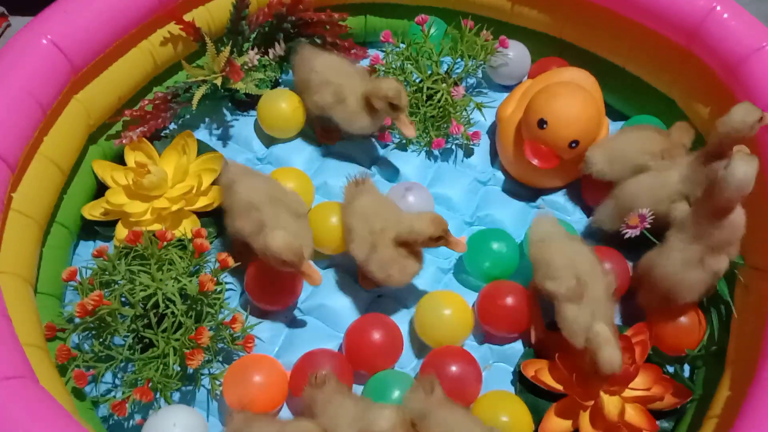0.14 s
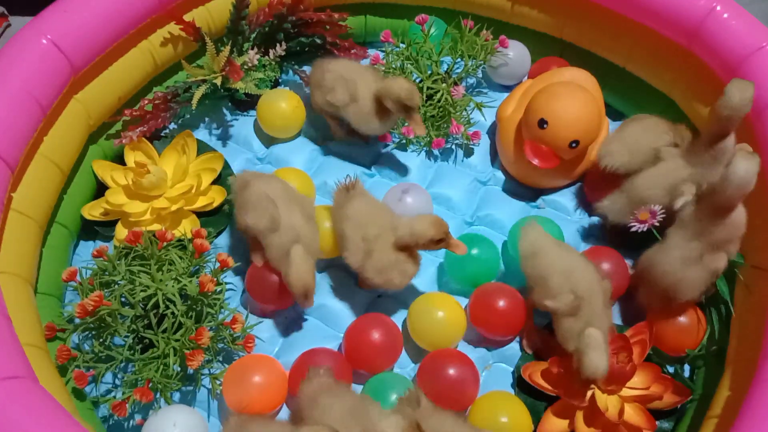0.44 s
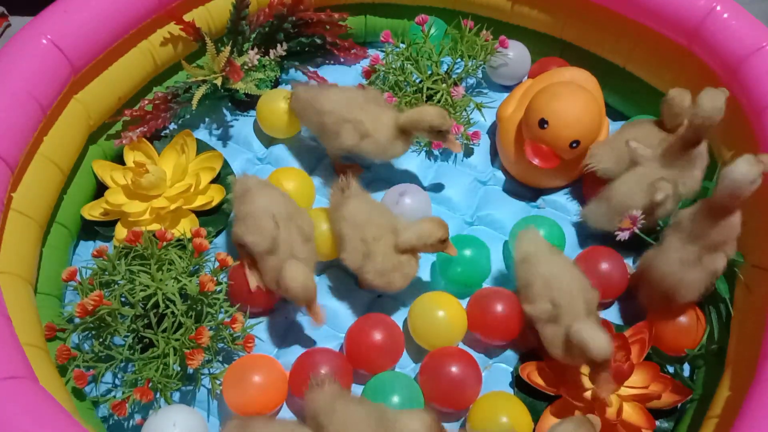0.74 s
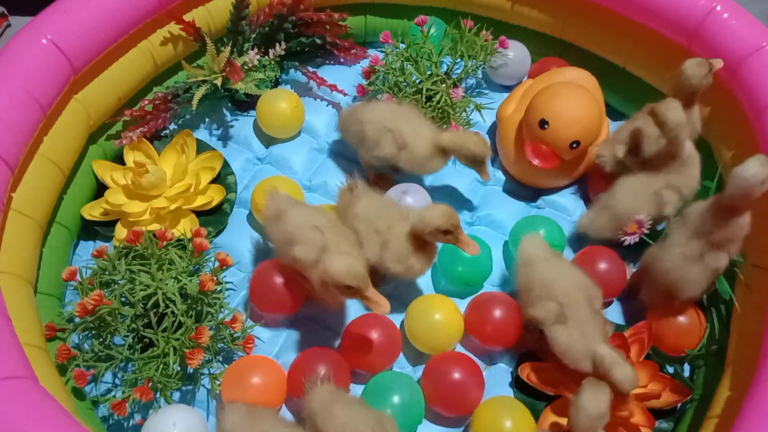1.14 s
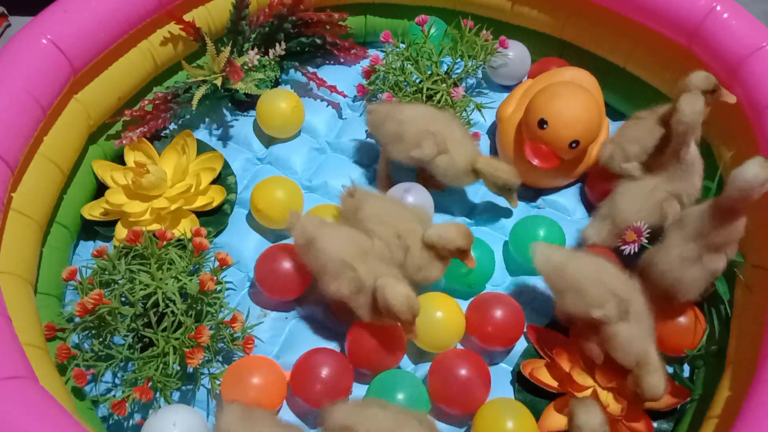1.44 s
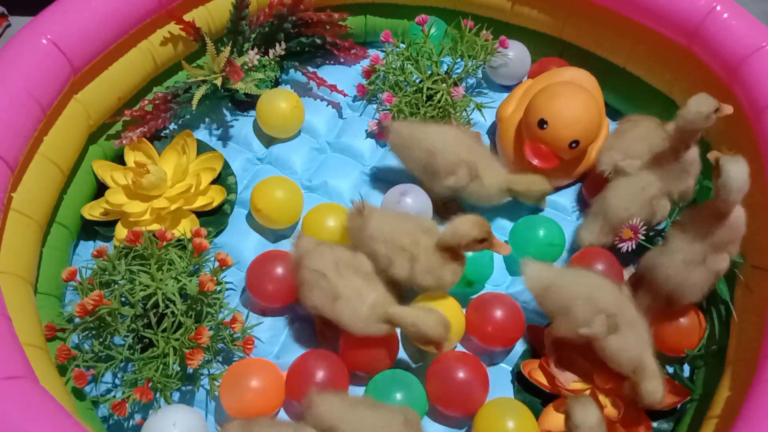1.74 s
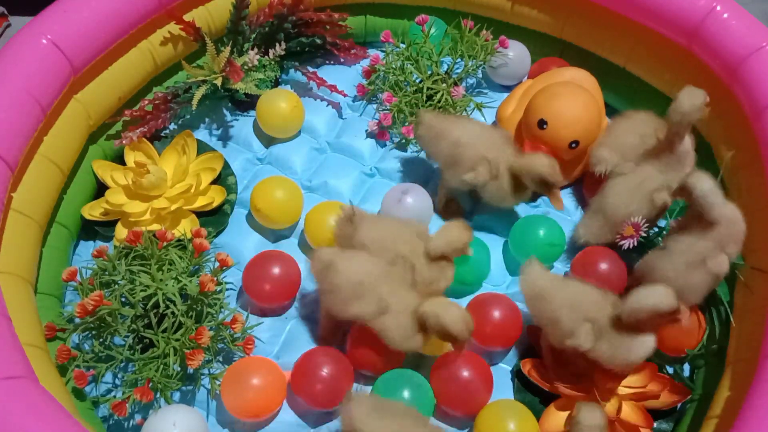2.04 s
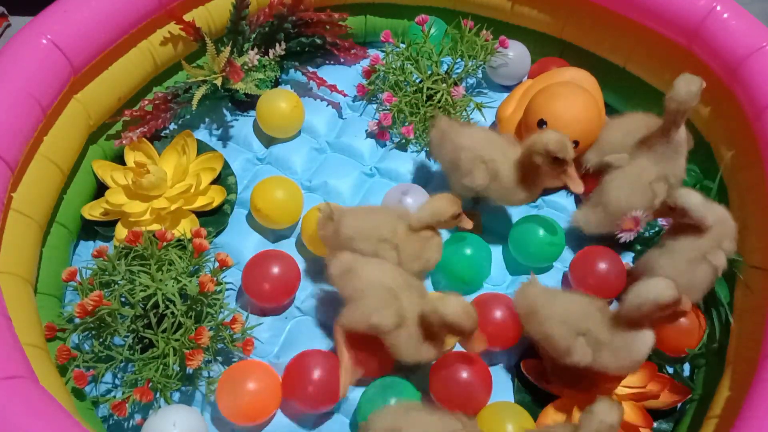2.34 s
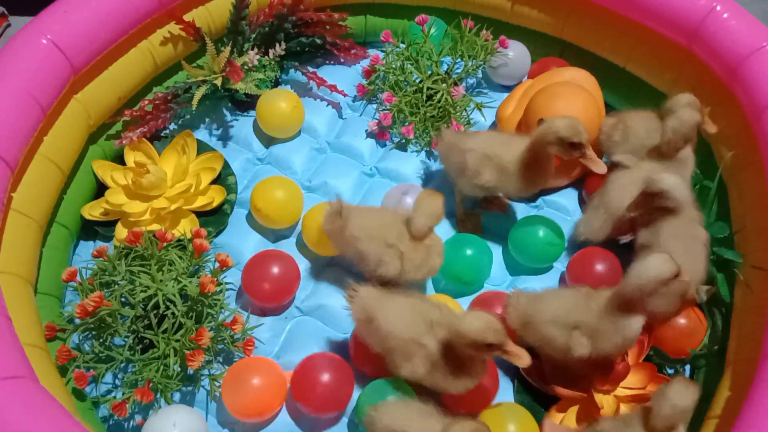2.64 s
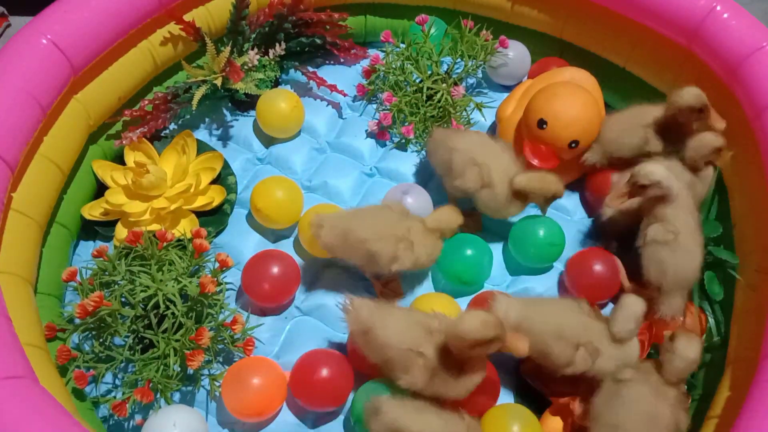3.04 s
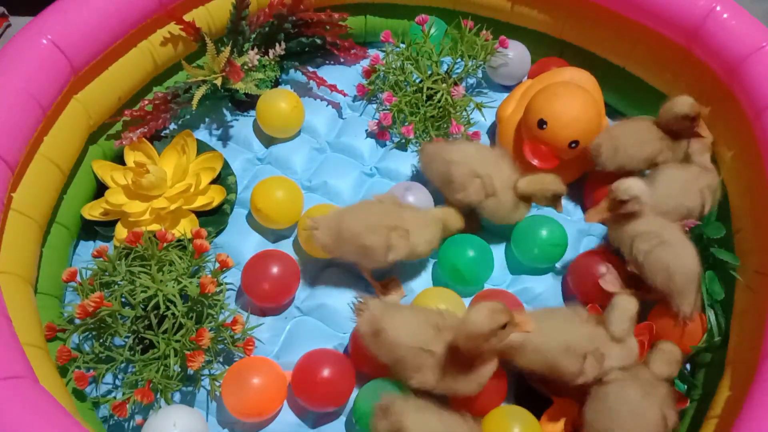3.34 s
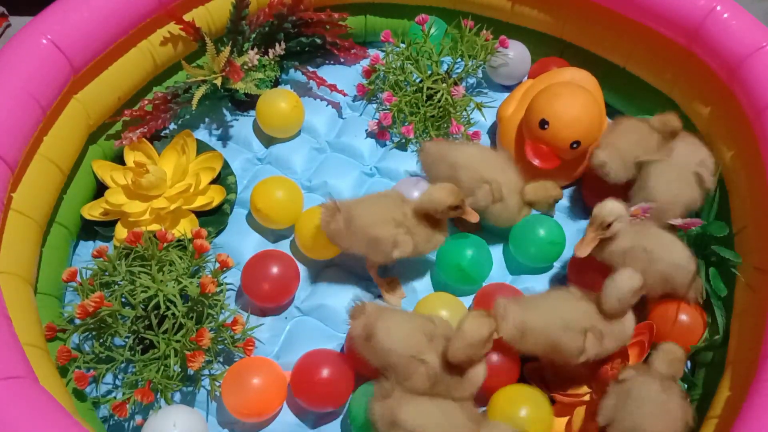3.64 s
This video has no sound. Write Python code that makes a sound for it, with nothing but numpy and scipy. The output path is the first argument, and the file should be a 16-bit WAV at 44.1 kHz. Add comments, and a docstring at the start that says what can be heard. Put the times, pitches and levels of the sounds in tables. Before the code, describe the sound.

Ducklings peep throughout, their short, high whistles rising and falling and often overlapping. From about 0.3 seconds their paddling feet slosh shallow water in uneven strokes, with light spray and bubbling. Hollow plops start just after 1 second, loudest near 1.7 and 3.2 seconds. The peeping and sloshing carry on until nearly 4 seconds, with a short echo from nearby walls, over a faint low hum and thin hiss.

```python
"""From the start, ducklings in a shallow inflatable pool of plastic balls peep over one another,
each peep a short whistle arching up and down in pitch, above a mains hum and a thin hiss.
Soon their paddling feet slosh the water, throwing spray and setting small bubbles ringing.
After about a second come hollow plops, loudest near 1.7 s and 3.2 s. Peeping and sloshing go on
to the end, and nearby walls follow each sound with a short echo."""
import sys
import numpy as np
from scipy import signal
from scipy.fft import rfft, irfft
from scipy.io import wavfile

SR = 44100
rng = np.random.default_rng(int(sys.argv[2]) if len(sys.argv) > 2 else 0)


def wav_out(sig):
    """Save sig, one row per channel (or a flat mono array), as 16-bit PCM at SR to the path in sys.argv[1]."""
    wavfile.write(sys.argv[1], SR, np.round(np.clip(np.atleast_2d(sig).T, -1, 1) * 32767).astype(np.int16))


N = 167580

# Mains hum. Each row: harmonic number, rms level in dB.
HUM_HARMONICS = [(1,-47),(3,-55.5)]
# Spectrum of the hiss. Each row: frequency in Hz, relative density in dB.
HISS_SPECTRUM = [(45,-11.5),(250,-1.5),(1900,-11),(4500,-53),(6100,-23.5),(6800,5),(7500,7.5),(8400,-13),(12500,-22.5),(15300,-29.5)]
# Reverberation. Each row: frequency in Hz, seconds to fall by 60 dB.
ROOM_DECAY = [(900,0.19),(9000,0.17)]
# Spectrum of spray and wet ticks. Each row: frequency in Hz, relative density in dB.
SPRAY_SPECTRUM = [(1700,-3.5),(3300,2),(4300,-7),(5500,3),(6200,-2.5),(7300,2.5),(8600,-11),(12000,-13),(15300,-1.5)]
# Strokes of the feet. Each row: peak time in seconds, time constant in seconds, spray level in dB,
# bubbling level in dB.
FOOT_STROKES = [(0.314,0.046,-28.5,-48),(0.46,0.24,-35.5,-74),(0.684,0.024,-28,-32),(1.047,0.061,-36.5,-39),(1.248,0.07,-30.5,-40.5),(1.41,0.054,-34,-61),(1.79,0.015,-46,-25),
                (2.06,0.025,-27.5,-28.5),(2.196,0.037,-33,-31),(2.322,0.013,-29,-25),(2.453,0.075,-26,-44),(2.641,0.042,-28,-36.5),(3.047,0.045,-33.5,-42.5),(3.203,0.092,-31,-33.5),(3.56,0.049,-26,-32)]
# Hollow plops. Each row: start in seconds, level in dB, pitch in Hz, swell time in seconds,
# relative level of the tick in dB.
HOLLOW_PLOPS = [(1.1575,-10,2800,0.0003,-8.5),(1.1672,-18.5,1050,0.0003,-6),(1.69,0,1133,0.00081,-16.5),(2.038,-17,1330,.0012,-4.5),(2.315,-12.5,1065,0.00069,-5),
                (3.197,-3,1240,0.00044,-36),(3.2076,-14.5,1340,0.00064,0.5),(3.303,-14.5,1350,0.0011,-20)]
# Single whistles. Each row: time of the arch's top in seconds, top pitch in Hz, half length in seconds,
# level in dB before the throat resonance.
PLAIN_PEEPS = [(.001,3103,.022,-19.5),(.095,3020,.030,-20),(0.144,3470,0.026,-23.5),(0.188,3860,0.028,-33),(0.205,3426,0.031,-22),(.250,3227,0.033,-19),
               (0.334,3477,0.026,-23.5),(0.39,3308,.029,-16),(.491,3500,0.045,-22),(0.562,3515,0.026,-22.5),(0.585,3970,0.031,-26.5),(0.656,3458,0.037,-20.5),
               (0.861,3270,0.052,-29),(.948,2850,0.028,-26),(1.042,2926,0.047,-24),(1.067,3600,0.03,-16.5),(1.23,3584,0.054,-26),(1.242,3247,0.035,-19),
               (1.359,3434,0.026,-23.5),(1.412,3610,.028,-17.5),(1.567,3624,0.021,-27),(1.602,3700,0.023,-24.5),(1.816,3160,0.039,-26),(1.86,3055,0.036,-22.5),
               (1.953,3690,0.014,-30),(2.034,3280,0.027,-22.5),(2.08,3404,0.04,-22),(2.128,3717,0.037,-24),(2.363,3746,0.039,-21.5),(2.43,3206,0.035,-23.5),
               (2.546,3750,0.048,-26.5),(2.581,3310,0.029,-22),(2.740,3540,0.034,-21.5),(2.833,3610,0.031,-22),(2.945,3494,0.035,-31.5),(3.043,3510,0.035,-25),
               (3.096,3530,.034,-22),(3.234,3860,0.032,-31),(3.285,3614,0.04,-20.5),(3.331,2795,0.04,-28),(3.421,3930,0.024,-31.5),(3.488,2980,.033,-30),(3.625,3370,0.014,-28)]
# Shriller peeps that carry a second, higher whistle. Each row: as for the plain peeps.
SHRILL_PEEPS = [(.010,3855,0.024,-28),(0.447,3730,0.029,-28.5),(.812,3824,0.033,-25.5),(.989,3904,0.043,-26.5),(1.391,4310,0.023,-26),
                (1.44,3855,0.039,-24),(1.63,3784,0.043,-28),(2.297,3650,0.031,-24.5),(3.005,3940,0.035,-28.5)]
# A whistle's overtones. The one entry: relative level of the octave in dB.
PEEP_OVERTONES_DB = [-20]

HUM_HZ, HISS_DB, HISS_WAVER_DB = 100.7, -39.5, 1.2
ROOM_DB, PLOP_ROOM_DB = -5, -4
DROPS_PER_S, LAP_SPRAY_DB, SPRAY_PATCHY_DB, WATER_LOW_HZ = 1800, -55, 4.5, 454
BUBBLES_PER_S, BUBBLE_HZ, BUBBLE_LOG_SPREAD, BUBBLE_DECAY_CYCLES = 600, 1188, 0.444, 3.44
LOW_NOTE_RATIO, LOW_NOTE_DB = 0.72, -9.5
PITCH_SAG, UPPER_RATIO = 0.6, 1.47  # fractional drop far from the top; upper whistle's pitch ratio
ONSET_LEAD, ONSET_WIDTH = 0.82, 0.11  # in half lengths: the voice catches before the top
THROAT_HZ, THROAT_WIDTH_HZ, THROAT_DB = 3240, 940, 8.5
FLUTTER_DB, ECHO_DB, ECHO_MAX_S = 2.35, -24, 0.016
CLIP_LEVEL, BAND_LIMIT_HZ = .7, 15600


def amp(db):
    """Amplitude grows tenfold for every 20 dB."""
    return 10 ** (np.asarray(db) / 20)


def unit(x):
    """Normalisation to rms 1."""
    return x / np.sqrt(np.mean(x ** 2) + 1e-20)


def curve_at(points, hz):
    """Interpolation on a logarithmic frequency axis."""
    f, value = np.transpose(points)
    return np.interp(np.log(hz + 1), np.log(f), value)


def add(mix, start_s, sound):
    """Superposition: a sound adds to the mix from its start time."""
    at = round(start_s * SR)
    sound = sound[max(-at, 0):]
    part = mix[max(at, 0):][:len(sound)]
    part += sound[:len(part)]


def colour(x, spectrum):
    """Filtering multiplies the spectrum of x by a gain curve; the result has rms 1."""
    gain = amp(curve_at(spectrum, np.fft.rfftfreq(len(x), 1 / SR)))
    return unit(irfft(rfft(x) * gain, len(x)))


def wander(rate_hz, size=N):
    """Low-passed noise gives a smooth random fluctuation of rms 1."""
    hz = np.fft.rfftfreq(size, 1 / SR)
    return unit(irfft(rfft(rng.standard_normal(size)) * np.exp(-(hz / rate_hz) ** 2), size))


def impulses(per_s, spread_db):
    """A Poisson process: independent clicks of uneven size."""
    size = amp(spread_db * np.minimum(rng.exponential(1, N), 4)) * np.sign(rng.standard_normal(N))
    return size * (rng.random(N) < per_s / SR)


def no_bass(x):
    """A third-order high-pass leaves the water's sounds almost no bass."""
    return signal.sosfilt(signal.butter(3, WATER_LOW_HZ, "high", fs=SR, output="sos"), x)


def mains_hum():
    """A periodic tone is a sum of harmonics, here odd ones."""
    phase = 2 * np.pi * HUM_HZ * np.arange(N) / SR
    return sum(amp(db) * unit(np.sin(k * phase)) for k, db in HUM_HARMONICS)


def hiss():
    """Noise with a bright band wavers under slight amplitude modulation."""
    level = amp(HISS_DB + HISS_WAVER_DB * wander(rate_hz=30))
    return level * colour(rng.standard_normal(N), HISS_SPECTRUM)


def reverberation(x):
    """Wall reflections merge into a diffuse tail that decays exponentially, faster in the treble."""
    hz, t, noise = signal.stft(rng.standard_normal(SR // 2), SR)
    decay = amp(-60 * t / curve_at(ROOM_DECAY, hz)[:, None])
    tail = signal.istft(noise * decay, SR)[1]
    tail *= np.minimum(np.arange(len(tail)) / SR / 0.002, 1)  # builds up over 2 ms
    return signal.fftconvolve(x, tail / np.linalg.norm(tail))[:N]


def bubbles():
    """Each bubble rings as a damped oscillator; the higher its pitch, the sooner it dies."""
    t = np.arange(SR // 20) / SR
    bubbling = np.zeros(N)
    pitches = BUBBLE_HZ * np.exp(BUBBLE_LOG_SPREAD * rng.standard_normal(size=40))
    for hz in pitches:
        ring = np.sin(2 * np.pi * hz * t) * np.exp(-hz * t / BUBBLE_DECAY_CYCLES)
        births = impulses(BUBBLES_PER_S / len(pitches), spread_db=6.5)
        bubbling += signal.oaconvolve(births, ring)[:N]
    return unit(bubbling)


def sloshing():
    """Strokes of the feet throw spray and churn up bubbles; being incoherent, they add in power."""
    t = np.arange(N) / SR
    spray_power, bubble_power = amp(LAP_SPRAY_DB) ** 2, 0  # the water never quite rests
    for peak_s, length_s, spray_db, bubble_db in FOOT_STROKES:
        u = (t - peak_s) / length_s
        stroke = np.exp(-np.where(u < 0, u ** 2, u))  # Gaussian rise, exponential fall
        spray_power += (amp(spray_db) * stroke) ** 2
        bubble_power += (amp(bubble_db) * stroke) ** 2
    churn = np.sqrt(bubble_power) * bubbles()
    drops = colour(impulses(DROPS_PER_S, spread_db=1.5), SPRAY_SPECTRUM)
    patchiness = amp(SPRAY_PATCHY_DB * wander(rate_hz=32))
    return no_bass(np.sqrt(spray_power) * drops * patchiness + churn)


def plop(db, hz, swell_s, tick_db):
    """Heavy damping: two hollow notes and a wet tick swell and die within a few cycles."""
    t = np.arange(SR // 20) / SR
    envelope = t / swell_s * np.exp(1 - t / swell_s)
    phase = 2 * np.pi * hz * t
    notes = np.sin(phase) + amp(LOW_NOTE_DB) * np.sin(LOW_NOTE_RATIO * phase)
    tick = amp(tick_db) * colour(rng.standard_normal(len(t)), SPRAY_SPECTRUM)
    return amp(db) * no_bass(envelope * (notes + tick))


def peep(top_s, top_hz, half_s, db, jitter=0.0084, voiced_share=1):
    """Source and filter: an arching whistle swells as it sweeps through the throat's resonance."""
    t = np.arange(-SR // 10, SR // 10) / SR
    arch = 1 - PITCH_SAG * (1 - np.exp(-(t / half_s) ** 2))
    hz = top_hz * arch * (1 + jitter * wander(rate_hz=560, size=len(t)))  # jitter makes it hoarse
    throat_db = THROAT_DB * (1 / (1 + ((hz - THROAT_HZ) / THROAT_WIDTH_HZ) ** 2) - .5)
    flutter_db = FLUTTER_DB * wander(rate_hz=61, size=len(t))
    attack = .5 + .5 * np.tanh((t / half_s + ONSET_LEAD) / ONSET_WIDTH)
    release = np.exp(-(np.maximum(t, 0) / (voiced_share * half_s)) ** 4)
    level = attack * release * amp(db + throat_db + flutter_db) * (hz / top_hz) ** 2
    phase = 2 * np.pi * np.cumsum(hz) / SR
    overtones = sum(amp(d) * np.sin(k * phase) for k, d in enumerate(PEEP_OVERTONES_DB, 2))
    rasp = overtones * wander(rate_hz=160, size=len(t))
    voice = level * (np.sin(phase) + rasp)
    # early reflections from the pool's wall and floor
    echoes = sum(np.roll(voice, int(SR * ECHO_MAX_S * d)) for d in rng.random(size=3))
    return top_s + t[0], voice + amp(ECHO_DB) * echoes


def ducklings():
    """Peeps overlap; the shrill ones show biphonation, with a higher, hoarser, shorter second whistle."""
    voices = np.zeros(N)
    for row in PLAIN_PEEPS + SHRILL_PEEPS:
        add(voices, *peep(*row))
    for top_s, hz, half_s, db in SHRILL_PEEPS:
        add(voices, *peep(top_s, hz * UPPER_RATIO, half_s, db, jitter=0.0537, voiced_share=0.36))
    return voices


def scene():
    """Direct sound and its reverberation superpose on the hum and hiss."""
    voices = ducklings()
    plops = np.zeros(N)
    for start_s, *shape in HOLLOW_PLOPS:
        add(plops, start_s, plop(*shape))
    pool = voices + sloshing()
    room = reverberation(amp(ROOM_DB) * pool + amp(PLOP_ROOM_DB) * plops)
    return (mains_hum() + hiss() + room + plops + pool)[None]


def record(dry):
    """Overload clips the loudest plops; a low-pass then limits the bandwidth."""
    clipped = np.clip(dry, -CLIP_LEVEL, CLIP_LEVEL)
    low_pass = signal.firwin(511, BAND_LIMIT_HZ, window=("kaiser", 9), fs=SR)
    return signal.oaconvolve(clipped, low_pass[None], "same")


dry = scene()
out = record(dry)
wav_out(out)
```